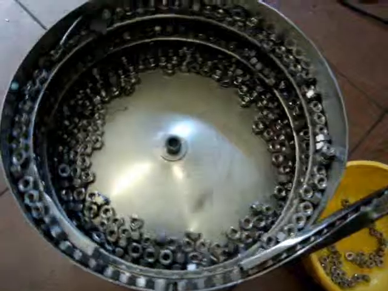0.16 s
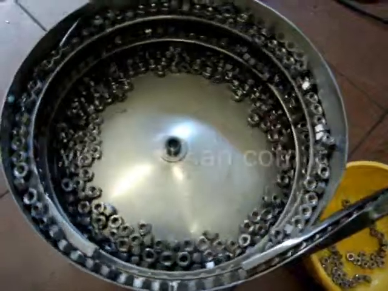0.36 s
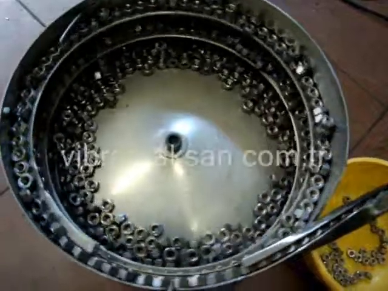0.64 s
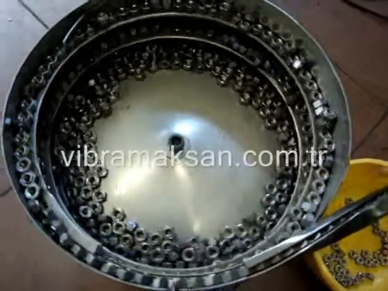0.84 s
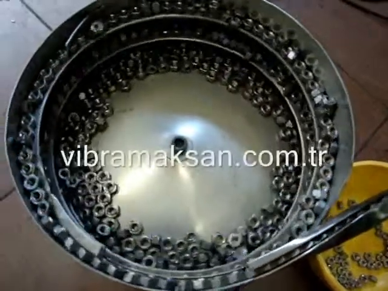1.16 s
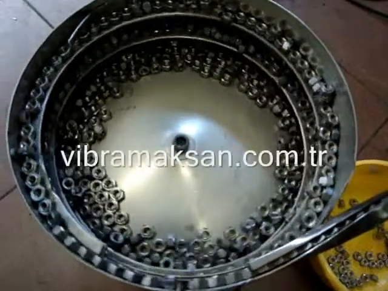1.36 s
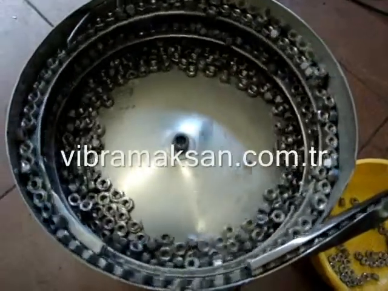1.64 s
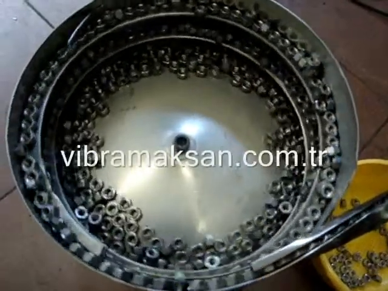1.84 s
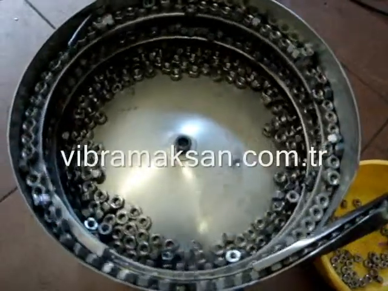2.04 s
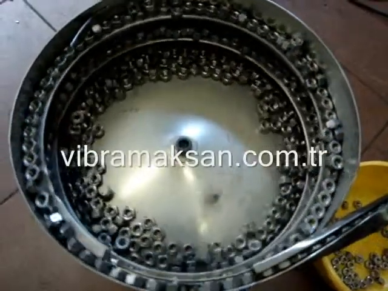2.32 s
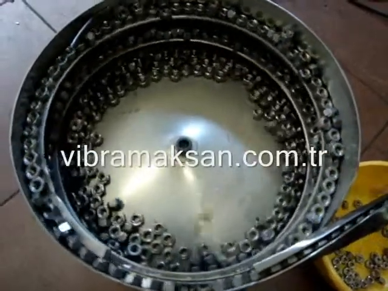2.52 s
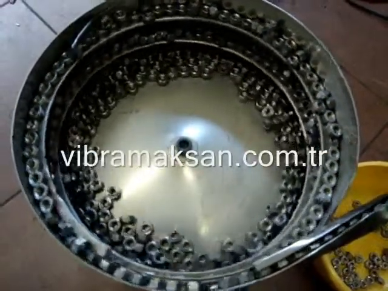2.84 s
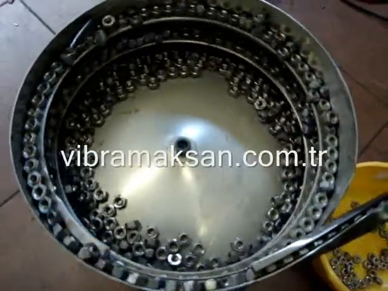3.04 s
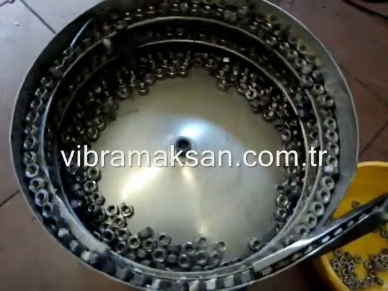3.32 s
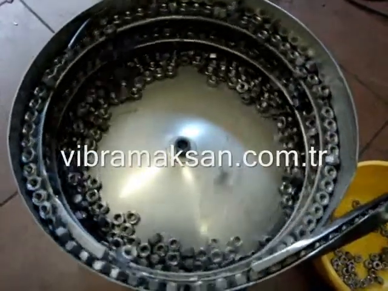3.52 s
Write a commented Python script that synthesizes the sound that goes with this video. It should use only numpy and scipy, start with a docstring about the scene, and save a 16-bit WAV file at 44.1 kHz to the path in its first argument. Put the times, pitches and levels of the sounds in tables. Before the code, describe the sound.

Small metal nuts rattle densely and continuously in a vibrating steel feeder bowl, with sharp clinks.

```python
"""After a moment of silence a dense steel rattle cuts in: nuts climbing a vibratory bowl feeder.
The bowl throws them up fifty times a second. Random impulses, some in step with the drive, excite
short noise bursts, pinging sines and the resonances of bowl, track and rail. Rail chatter comes in spells,
nuts tumble back with hollow knocks, and clicks and jingles stand out over room echo and workshop air."""
import sys
import numpy as np
from scipy import signal
from scipy.fft import rfft, irfft, next_fast_len
from scipy.io import wavfile

SR = 44100
rng = np.random.default_rng(int(sys.argv[2]) if len(sys.argv) > 2 else 0)


def log_audio(samples):
    """Write samples as a 16-bit WAV file to the path given in sys.argv[1]."""
    # one column per channel
    frames = np.atleast_2d(samples).T
    # limit to full scale, then quantise
    limited = np.clip(frames, -1, 1)
    pcm = np.round(limited * 32767).astype(np.int16)
    wavfile.write(sys.argv[1], SR, pcm)


N = 162288
DRIVE_HZ = 50.08

# Loose rattle, also riding the ticks, before each layer's trim: t/s, level/dB
RATTLE_LEVEL = [(0.2, -28), (0.6, -29.5), (0.68, -28.5), (1.22, -30), (2.51, -29.5), (2.52, -28.5),
                (2.81, -30), (3.33, -29.5), (3.4, -27.5), (3.48, -29), (3.66, -29)]
# Colour of a nut's contact, relative: f/Hz, level/dB per Hz
CONTACT_COLOUR = [(60, -27.5), (250, -14.5), (380, -20), (800, -12.5), (1100, -9), (1700, -6.5),
                  (2100, -2.5), (2750, -1.5), (3500, 4.5), (4050, -3.5), (4900, 3), (6200, 1.5),
                  (7000, -1.5), (7800, 1.5), (8400, -5), (9400, -2), (12800, -0.5), (15300, -1.5)]
# Resonances of the bowl: f/Hz, width/Hz, level/dB
BOWL_MODES = [(274.5, 25, -61.5), (512.6, 42, -55.5), (1000, 50, -53), (1197, 96, -49), (1600, 37, -50.5),
              (1963, 45, -43), (2223, 136, -40.5), (2580, 75, -40.5), (2945, 16, -42), (3008, 71, -40),
              (3356, 53, -40.5), (3750, 240, -39), (8700, 62, -46), (9250, 58, -45), (9300, 76, -60),
              (14260, 100, -41), (15080, 130, -36)]
# Ring of the spiral track, swelling and then falling at the end: t/s, level/dB
TRACK_LEVEL = [(.2, -43), (1.4, -41), (2.5, -38.5), (2.8, -37.5), (3.35, -36.5), (3.6, -45)]
# Resonances of the track, relative to its level: f/Hz, width/Hz, level/dB
TRACK_RESONANCES = [(4217, 48, 0.5), (4470, 67, -2)]
# Heap landing in step, before trim: t/s, level/dB
HEAP_LEVEL = [(0.2, -26), (0.29, -30), (0.36, -28.5), (0.51, -34), (0.53, -29.5), (1.64, -30), (1.69, -28),
              (2.52, -32), (2.86, -28), (2.92, -31), (2.97, -23), (2.99, -37), (3.01, -33), (3.39, -28),
              (3.63, -42), (3.66, -27.5)]
# Colour of the bowl floor under the heap, relative: f/Hz, level/dB per Hz
FLOOR_COLOUR = [(500, -28.5), (1700, -19), (2100, -7.5), (2750, -9), (3000, 0), (3180, -4.5), (3350, -4.5),
                (3750, -3.5), (4100, -18), (9000, -21.5)]
# Spells of chatter on the rail, before trim: t/s, level/dB
CHATTER_LEVEL = [(.2, -29), (.46, -31.5), (.49, -44), (.55, -28.5), (.7, -29.5), (.87, -35), (.99, -29),
                 (1.2, -30.5), (1.38, -35.5), (1.46, -30), (1.68, -37), (1.88, -32.5), (2.29, -32.5),
                 (2.33, -42), (2.39, -33), (2.95, -31.5), (3.4, -39), (3.66, -34)]
# Resonances of the rail, relative: f/Hz, width/Hz, level/dB
RAIL_MODES = [(5655, 60, -4), (5720, 240, -3), (5900, 45, -10.5)]
# Nuts tumbling back into the bowl, before trims: t/s, knock level/dB, ring f/Hz, thud level/dB
TUMBLE_EVENTS = [(.203, -22, 1240, -35.5), (0.407, -26, 1190, -48), (.727, -25, 1300, -45),
                 (0.894, -27.5, 1170, -50), (1.081, -32, 1120, -56), (1.394, -23.5, 1095, -38),
                 (1.613, -26, 1380, -50), (1.726, -28, 1290, -51), (1.998, -17, 1160, -49),
                 (2.19, -30, 1006, -58), (2.335, -32, 1600, -60), (2.41, -25.5, 1000, -50),
                 (2.421, -21, 1210, -38), (2.646, -22, 1040, -58), (2.712, -19, 1163, -49),
                 (3.25, -23.5, 1600, -58), (3.327, -28, 1240, -53), (3.576, -30, 1000, -61)]
# Sharp nut-on-nut clicks, before trim and colour: t/s, peak level/dB
CLICK_EVENTS = [(0.18, -12), (0.303, -1), (0.7204, -15), (0.8014, -8), (1.0204, -20), (1.1014, -22),
                (1.3024, -4.5), (2.0174, -19), (2.2794, -16)]
# Spells of a free nut jingling: t/s, length/s, level/dB
JINGLE_SPELLS = [(0.177, 0.34, -41.5), (.78, 0.12, -40), (1.22, .08, -39), (2.343, 0.055, -35),
                 (3.142, 0.196, -36), (3.363, 0.073, -34.5)]
# Resonances of the jingling nut, relative: f/Hz, width/Hz, level/dB
JINGLE_RESONANCES = [(8011, 17, -2), (11890, 60, -9)]
# Colour of the workshop air, relative: f/Hz, level/dB per Hz
AIR_COLOUR = [(20, 0), (100, -2), (250, -0.5), (600, -0.5), (3000, -8), (15000, -27.5)]

# Layer trims
RATTLE_DB, TICK_DB, HEAP_DB, CHATTER_DB = 3, -1, -1.5, -1.5
TUMBLE_DB, THUD_DB, CLICK_DB = 0.5, 10.5, -1
TICK_HZ, TICK_OCTAVES, TICK_T60_S = 5806, 0.552, 0.012  # median pitch, its spread, decay
KNOCK_CRACK_DB, BOUNCE_DB = -2.5, -11  # dull crack in the knock; hop one drive cycle later
TUMBLE_T60_S, CRACK_T60_S, THUD_T60_S = 0.035, 0.05, 0.025
ROOM_DB, ROOM_T60_S, AIR_DB = -10, 0.39, -48.5
START_S, SHELF_HZ, SHELF_DB, TOP_HZ = 0.1688, 10050, -12, 15800


def amp(db):
    """Decibels to gain."""
    return 10 ** (np.asarray(db) / 20)


def unit(x):
    """Scale to rms 1."""
    return x / np.sqrt(np.mean(x ** 2) + 1e-20)


def level(rows):
    """Gain per sample, gliding in dB between the table's points."""
    return amp(np.interp(np.arange(N) / SR, *np.transpose(rows)))


def decay(t, t60):
    """Exponential fall of 60 dB in t60 seconds."""
    return np.exp(-np.log(1000) * t / t60)


def filtered(x, response):
    """Shape x with a complex response of frequency, padded against wrap-around."""
    size = 2 * next_fast_len(N // 2 + SR // 4)
    return irfft(rfft(x, size) * response(np.fft.rfftfreq(size, 1 / SR)), size)[:N]


def coloured(x, points):
    """Minimum-phase filter through (f/Hz, level/dB) points, so no sound precedes its blow."""
    def response(hz):
        f, db = np.transpose(points)
        log_gain = np.log(amp(np.interp(np.log(hz + 1), np.log(f), db)))
        # Folding the cepstrum onto positive time makes the filter causal
        cepstrum = irfft(log_gain)
        half = len(cepstrum) // 2
        cepstrum[1:half] *= 2
        cepstrum[half + 1:] = 0
        return np.exp(rfft(cepstrum))
    return filtered(x, response)


def burst(t60):
    """Noise of energy 1 that dies away."""
    t = np.arange(SR // 3) / SR
    noise = rng.standard_normal(len(t)) * decay(t, t60)
    return noise / np.linalg.norm(noise)


def bell(u):
    """Turn uniform draws into a bell-shaped spread around zero."""
    return np.log((u + 1e-3) / (1.001 - u)) / 1.8


def landings(per_s, in_step, phase, scatter, uneven_db):
    """Times and sizes of blows; a share falls near one phase (in cycles) of the drive."""
    count = int(per_s * N / SR)
    when, pick, late, size = rng.random((count, 4)).T
    free_cycles = (np.arange(count) + when) / count * N / SR * DRIVE_HZ
    locked_cycles = np.floor(free_cycles) + phase + scatter * bell(late)
    cycles = np.where(pick < in_step, locked_cycles, free_cycles)
    return cycles / DRIVE_HZ, amp(uneven_db * bell(size))


def pulses(times, sizes):
    """One impulse per blow."""
    return np.bincount((times * SR).astype(int) % N, sizes, N)


def clatter(times, sizes, t60, count=24):
    """Blows spread over many spots, each with its own short noise ring."""
    out = np.zeros(N)
    for spot in range(count):
        blows = pulses(times[spot::count], sizes[spot::count])
        out += signal.oaconvolve(blows, burst(t60))[:N]
    return unit(out)


def ring(times, sizes, modes):
    """Every blow pushes each resonance one way or the other."""
    out = np.zeros(N)
    for hz, width, db in modes:
        blows = pulses(times, sizes * np.sign(rng.standard_normal(len(times))))
        resonance = lambda f: 1j * f * width / (hz * hz - f * f + 1j * f * width)
        out += amp(db) * unit(filtered(blows, resonance))
    return out


def loose_nuts():
    """Thousands of small contacts a second rattle, and also ring the bowl and its track."""
    times, sizes = landings(per_s=2200, in_step=0.06, phase=0.12, scatter=0.12, uneven_db=2.0)
    contacts = unit(coloured(clatter(times, sizes, t60=0.0034, count=48), CONTACT_COLOUR))
    rattle = amp(RATTLE_DB) * level(RATTLE_LEVEL) * contacts
    bowl_ring = ring(times, sizes, BOWL_MODES)
    track_ring = level(TRACK_LEVEL) * ring(times, sizes, TRACK_RESONANCES)
    return rattle + bowl_ring + track_ring


def ticks():
    """Single nuts tick as short decaying sines, each at its own pitch."""
    times, sizes = landings(per_s=1300, in_step=0.045, phase=0.11, scatter=0.12, uneven_db=0.0)
    octaves = TICK_OCTAVES * rng.standard_normal((len(times), 1))
    hz = np.clip(TICK_HZ * 2 ** octaves, 1900, SR / 2)
    t = np.arange(SR // 50) / SR
    envelope = decay(t, TICK_T60_S) * (1 - np.exp(-t / 0.0001))
    pings = sizes[:, None] * np.sin(2 * np.pi * hz * t) * envelope
    where = (times[:, None] * SR).astype(int) + np.arange(len(t))
    ticking = unit(np.bincount(where.ravel() % N, pings.ravel(), N))
    return amp(TICK_DB) * level(RATTLE_LEVEL) * ticking


def heap():
    """The heap slaps the bowl floor, most of its blows bunched once a drive cycle."""
    times, sizes = landings(per_s=400, in_step=0.65, phase=0.04, scatter=0.06, uneven_db=1.05)
    slaps = unit(coloured(clatter(times, sizes, t60=0.0059), FLOOR_COLOUR))
    return amp(HEAP_DB) * level(HEAP_LEVEL) * slaps


def rail():
    """Nuts on the track chatter in spells and excite the rail's resonances."""
    times, sizes = landings(per_s=330, in_step=0.35, phase=0.16, scatter=0.06, uneven_db=0.6)
    return amp(CHATTER_DB) * level(CHATTER_LEVEL) * ring(times, sizes, RAIL_MODES)


def thump(lo_hz, hi_hz, t60):
    """Band-passed dying noise with a peak of 1."""
    band = signal.butter(2, [lo_hz, hi_hz], "bandpass", fs=SR, output="sos")
    x = signal.sosfilt(band, burst(t60))
    return x / abs(x).max()


def tumbles():
    """A falling nut gives a short hollow knock and a low thud, then hops once more."""
    out = np.zeros(N + SR)
    t = np.arange(SR // 3) / SR
    envelope = decay(t, TUMBLE_T60_S) * (1 - np.exp(-t / 0.0012))
    for s, db, hz, thud_db in TUMBLE_EVENTS:
        for delay, loss_db in [(0, 0), (1 / DRIVE_HZ, BOUNCE_DB)]:
            hollow = np.sin(2 * np.pi * hz * t) * envelope
            crack = amp(KNOCK_CRACK_DB) * thump(980, 2400, CRACK_T60_S)
            thud = amp(thud_db + THUD_DB) * thump(380, 900, THUD_T60_S)
            blow = amp(db + TUMBLE_DB) * (hollow + crack) + thud
            out[round((s + delay) * SR):][:len(t)] += amp(loss_db) * blow
    return out[:N]


def clicks():
    """The hardest single contacts stand out of the rattle as very short noise bursts."""
    out = np.zeros(N + SR)
    for s, db in CLICK_EVENTS:
        click = burst(0.0037)
        out[round(s * SR):][:len(click)] += amp(db + CLICK_DB) * click / abs(click).max()
    return coloured(out[:N], CONTACT_COLOUR)


def jingles():
    """A free nut rings brightly at its resonances while it dances."""
    t = np.arange(N) / SR
    spells = np.zeros(N)
    for s, length, db in JINGLE_SPELLS:
        inside_s = np.minimum(t - s, s + length - t)
        spells += amp(db) * np.clip(inside_s / 0.017 + 0.5, 0, 1)  # 17 ms fades
    times, sizes = landings(per_s=150, in_step=0.37, phase=0.1, scatter=0.1, uneven_db=1)
    return spells * ring(times, sizes, JINGLE_RESONANCES)


def room(x, count=12):
    """The room answers with a different noise tail every 20 ms as the sound moves round the bowl."""
    turn = np.arange(N) // (SR // 50) % count
    out = np.zeros(N)
    for k in range(count):
        out += signal.oaconvolve(x * (turn == k), burst(ROOM_T60_S))[:N]
    return out


def workshop_air():
    """Steady noise, weighted to the lows, lies under everything."""
    return amp(AIR_DB) * unit(coloured(rng.standard_normal(N), AIR_COLOUR))


def scene():
    """Mix the feeder, its room and the workshop air."""
    feeder = loose_nuts() + ticks() + heap() + rail() + tumbles() + clicks() + jingles()
    return (feeder + amp(ROOM_DB) * room(feeder) + workshop_air())[None]


def record(dry):
    """The sound cuts in over 7.7 ms; the highs are shelved down, then end at a steep edge."""
    opened = np.clip((np.arange(N) / SR - START_S) / 0.0077, 0, 1)
    shelf = lambda hz: amp(SHELF_DB * np.clip((hz - SHELF_HZ) / 250 + 0.5, 0, 1))
    edge = lambda hz: 0.5 - 0.5 * np.tanh((hz - TOP_HZ) / 40)
    return filtered(dry[0] * opened, lambda hz: shelf(hz) * edge(hz))[None]


dry = scene()
out = record(dry)
log_audio(out)
```